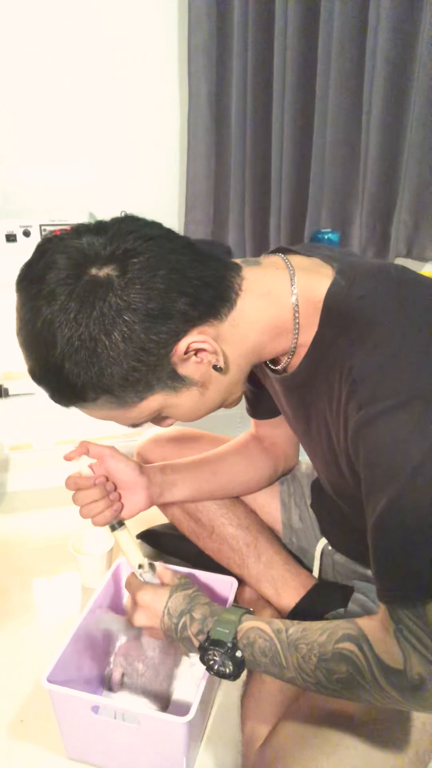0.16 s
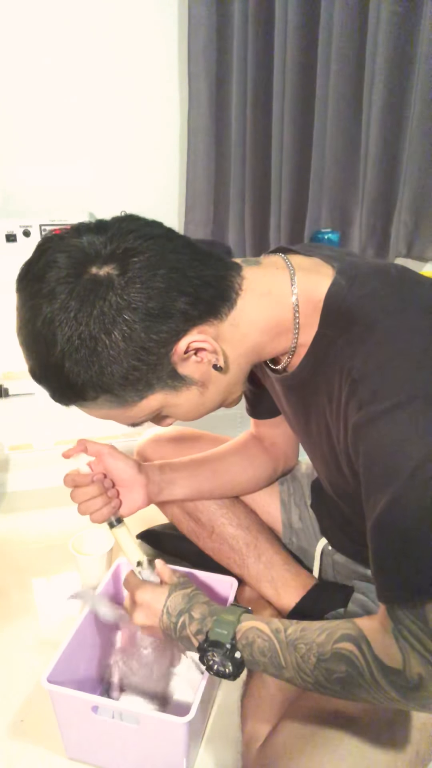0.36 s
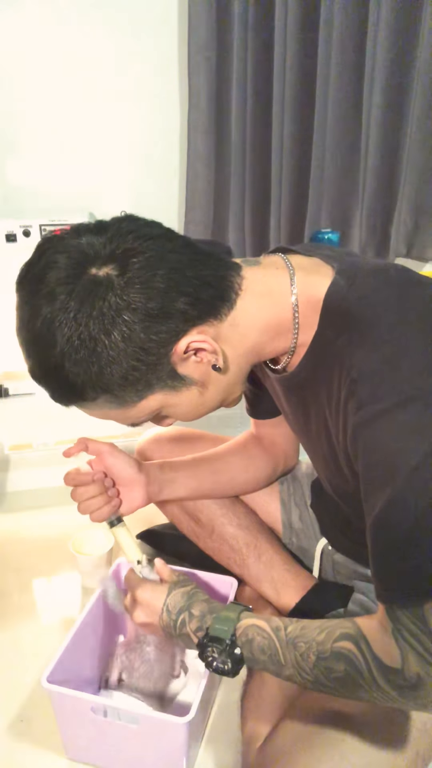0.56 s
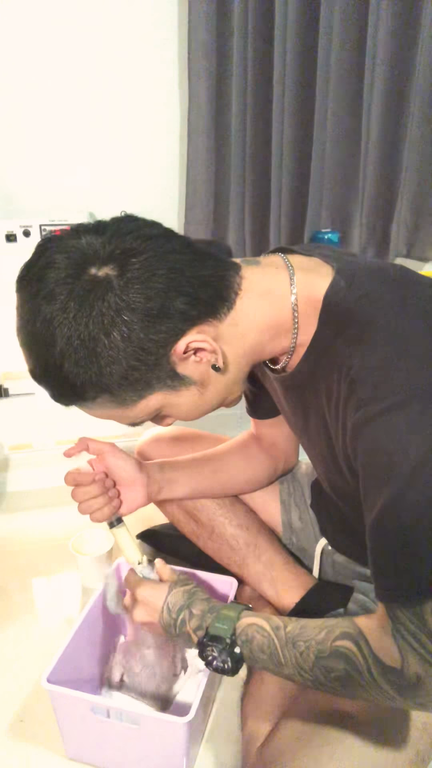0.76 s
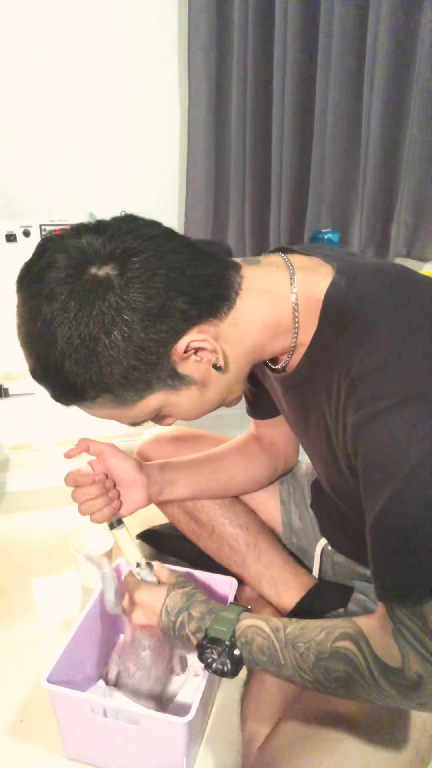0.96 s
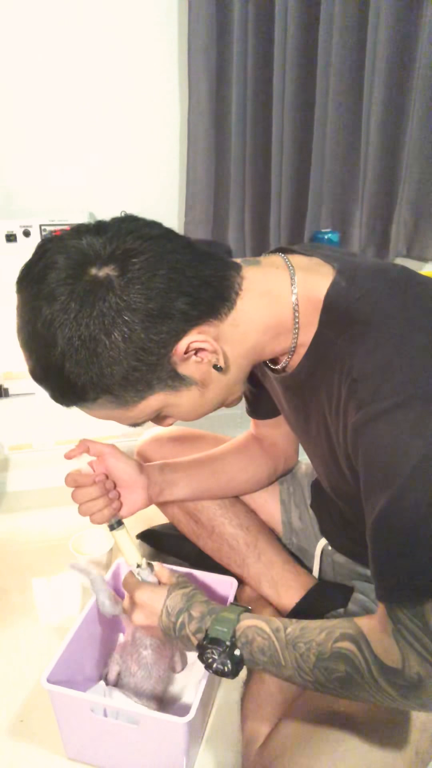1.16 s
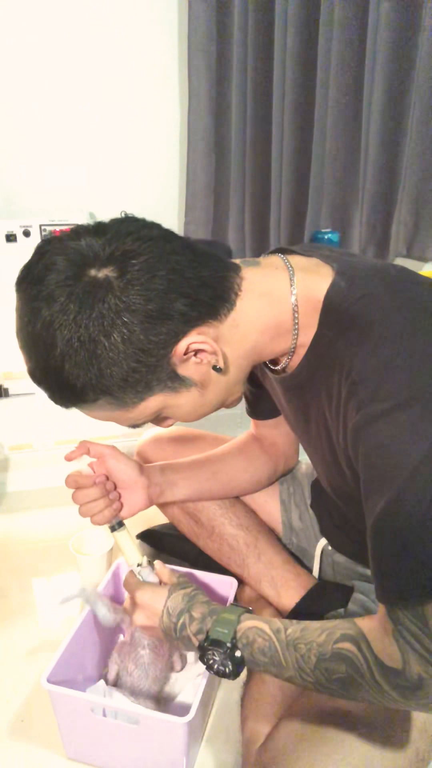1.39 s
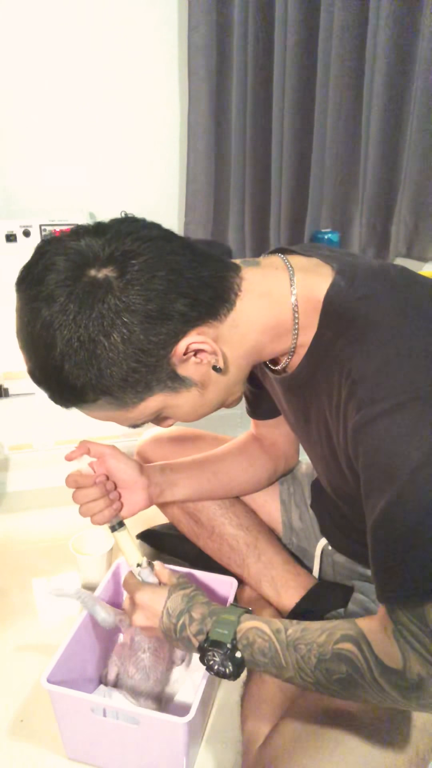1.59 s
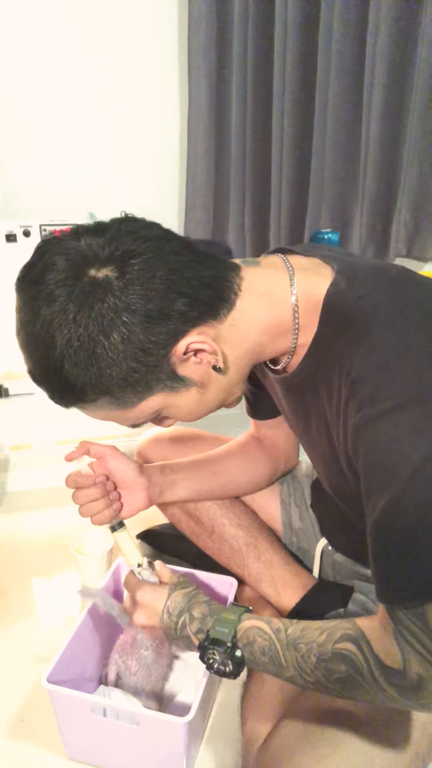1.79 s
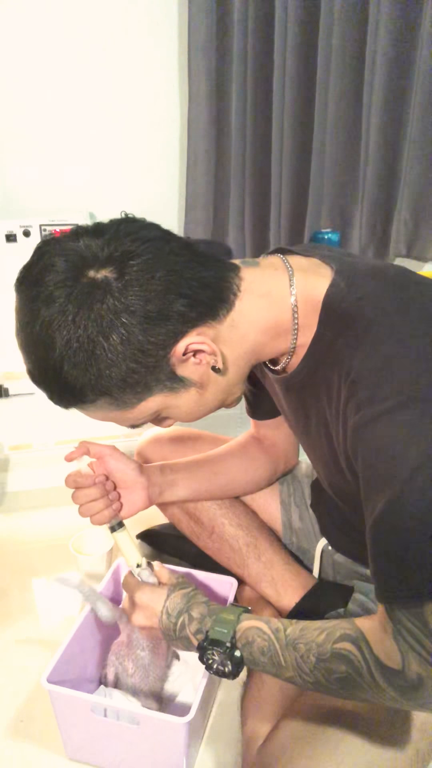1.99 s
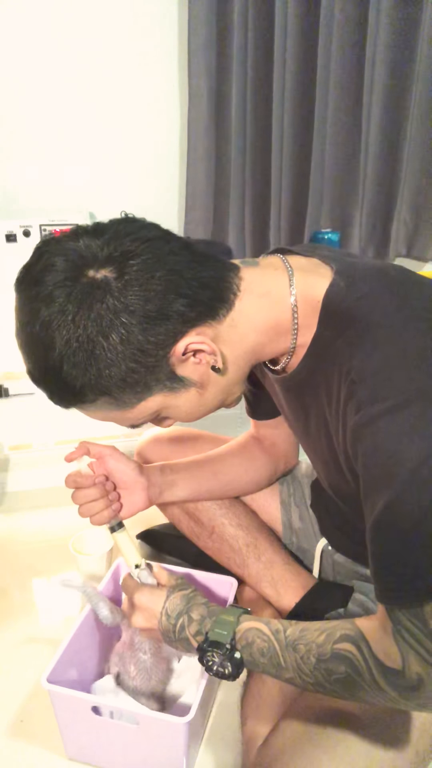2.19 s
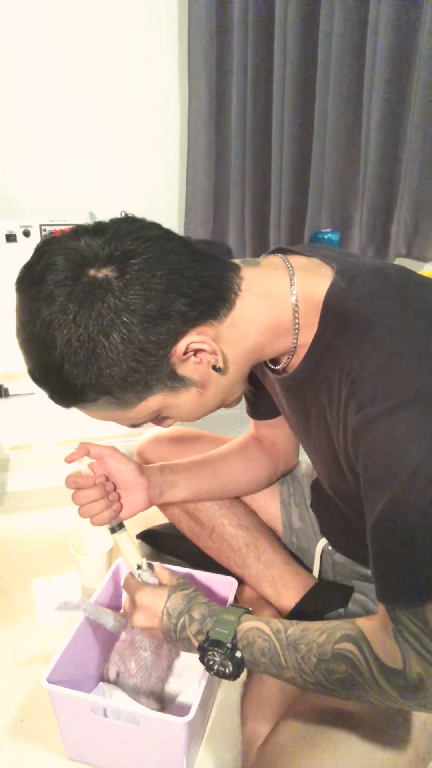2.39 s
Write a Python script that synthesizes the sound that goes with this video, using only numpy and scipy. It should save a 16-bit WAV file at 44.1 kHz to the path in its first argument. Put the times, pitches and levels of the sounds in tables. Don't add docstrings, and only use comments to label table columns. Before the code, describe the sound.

One loud raspy squawk from a baby parrot, followed by plastic knocks, clicks and paper rustle

```python
import sys
import numpy as np
from scipy import signal
from scipy.fft import rfft, irfft, next_fast_len
from scipy.io import wavfile
from scipy.ndimage import map_coordinates

SR = 44100
rng = np.random.default_rng(int(sys.argv[2]) if len(sys.argv) > 2 else 0)


def master(y):
    cut = np.clip(np.atleast_2d(y).T, -1, 1)
    pcm = np.round(cut * 32767)
    wavfile.write(sys.argv[1], SR, pcm.astype(np.int16))


def gain_from_decibels(decibels):
    exponent = np.asarray(decibels, float) / 20
    return 10 ** exponent


N = 108045


def unit(x):
    return x / np.sqrt(np.mean(x ** 2) + 1e-20)


def along(points, hz):
    f, v = np.transpose(points)
    return np.interp(np.log(hz + 1), np.log(f + 1), v)


def wobble(rate):
    knots = rng.standard_normal(int(N * rate / SR) + 4)
    return map_coordinates(knots, [np.arange(N) * rate / SR])


def filtered(x, response):
    m = next_fast_len(N + SR // 2)
    return irfft(rfft(x, m) * response(np.fft.rfftfreq(m, 1 / SR)), m)[..., :N]


def peak(f, hz, width):
    return 1j * f * width / (hz * hz - f * f + 1j * f * width)


def coloured(x, spectrum):
    return unit(filtered(x, lambda hz: gain_from_decibels(along(spectrum, hz))))


def bump(s, half):
    return np.exp(-.5 * ((np.arange(N) / SR - s) / half) ** 2)


def glide(s, half, hz0, hz1, waver):
    hz = np.interp(np.arange(N) / SR, [s - half, s + half], [hz0, hz1]) * (1 + waver)
    return bump(s, half * .7) * np.sin(2 * np.pi * np.cumsum(hz) / SR)


# f/Hz, t60/s
ROOM_DECAY = [(100, 0.51), (300, 0.47), (1000, 0.26), (4000, 0.25), (12000, 0.14)]


def room(x):
    delay_s = .006
    hz, t, z = signal.stft(rng.standard_normal(SR), SR, nperseg=256)
    decay = gain_from_decibels(-60 * t / along(ROOM_DECAY, hz)[:, None])
    tail = signal.istft(z * decay, SR, nperseg=256)[1]
    late = np.pad(x, (int(delay_s * SR), 0))
    return signal.fftconvolve(late, tail / np.linalg.norm(tail))[:N]


# f/Hz, level/dB per Hz
HUM_COLOUR = [(15, -57.5), (55, -3), (189, -8), (222, -3), (299, -9.5), (527, -15.5), (857, -23.5),
              (1010, -25), (15800, -48)]
# f/Hz, level/dB per Hz
CLOTH_COLOUR = [(600, -31), (1500, -2.5), (7000, 0.5), (8500, -19.5), (15500, -12.5)]


def air():
    t = np.arange(N) / SR
    hum_db = -57.5 + wobble(7.58)
    hum = gain_from_decibels(hum_db) * coloured(rng.standard_normal(N), HUM_COLOUR)
    stirred = np.clip((t - 0.195) / .1, 0, 1)
    cloth_db = -69 - 3.5 * t + 0.6 * wobble(25)
    return hum + stirred * gain_from_decibels(cloth_db) * coloured(rng.standard_normal(N), CLOTH_COLOUR)


# t/s, f/Hz, t60/s, level/dB
ROOM_BOOMS = [
    (.27, 125, 0.54, -44),
    (.43, 120, 0.55, -43.5),
    (.66, 104.3, 0.42, -37.5),
    (0.839, 104.9, 0.37, -41.5),
    (1.012, 105.4, 0.36, -44.5),
    (1.229, 105.8, 0.47, -41.5),
    (1.89, 122.7, 0.4, -42.5),
    (2.1, 104.2, 0.37, -44.5),
    (2.27, 102.5, 1, -51.5),
]


def booms():
    t, rise_s = np.arange(N) / SR, .03
    out = np.zeros(N)
    for s, hz, t60, db in ROOM_BOOMS:
        since = np.clip(t - s, 0, None)
        swell = gain_from_decibels(db - 60 * since / t60) * (1 - np.exp(-since / rise_s))
        out += swell * np.sin(2 * np.pi * hz * t)
    return gain_from_decibels(1.46 * wobble(33)) * out


def paper_grains():
    grains_per_s, spread_db = 1500, 4
    struck = rng.random(N) < grains_per_s / SR
    strength = gain_from_decibels(spread_db * np.minimum(rng.exponential(size=N), 2))
    return unit(struck * strength * rng.choice([-1, 1], size=N))


# middle t/s, half length/s, level/dB
RUSTLE_SWELLS = [(0.424, 0.021, -46.5), (0.484, 0.02, -57.5), (0.559, 0.017, -52), (0.596, 0.032, -55),
                 (0.702, 0.034, -60.5), (0.774, 0.011, -60), (0.916, 0.05, -60.5), (0.971, 0.0097, -70),
                 (1.09, 0.043, -66.5), (1.235, 0.038, -68), (1.331, 0.02, -69.5), (1.496, 0.01, -69.5),
                 (1.676, 0.018, -56.5), (1.798, 0.011, -65), (1.881, 0.0068, -61), (1.936, 0.019, -65.5),
                 (1.862, 0.063, -68), (2.09, 0.045, -68), (2.231, 0.022, -61), (2.296, 0.0094, -59.5),
                 (2.446, .015, -71)]
# f/Hz, level/dB per Hz
PAPER_COLOUR = [(350, -38.5), (600, -5), (1120, 1), (3330, -5), (4200, -4), (4880, -5.5), (7640, -9),
                (15500, -24)]


def bedding():
    rub = paper_grains() + 0.56 * rng.standard_normal(N)
    paper = coloured(rub, PAPER_COLOUR) * gain_from_decibels(2.3 * wobble(90))
    return paper * sum(gain_from_decibels(db) * bump(s, half) for s, half, db in RUSTLE_SWELLS)


def claw_scrape():
    grit = paper_grains() + rng.standard_normal(N)
    scrape = unit(filtered(grit, lambda f: peak(f, 4300, 500)))
    return gain_from_decibels(-61) * bump(.903, .028) * scrape


# start f/Hz, end f/Hz
SQUEAK_SLIDE = (5700, 6200)


def plunger_squeak():
    return gain_from_decibels(-66.5) * glide(2.14, .025, *SQUEAK_SLIDE, 0.033 * wobble(400))


# t/s, peak level/dB
CLICK_EVENTS = [(0.3094, -23), (0.4224, -25), (0.5145, -34.5), (0.5735, -28.5), (0.7043, -49.5),
                (0.7706, -57), (0.7823, -45), (0.8816, -39), (1.193, -50.5), (1.2309, -52.5), (1.3256, -54),
                (1.491, -55.5), (1.5975, -58), (1.6602, -45), (1.738, -48.5), (1.7889, -46), (1.8304, -43),
                (1.8536, -47), (2.2163, -39), (2.2905, -48), (2.3438, -48), (2.4213, -54.5)]
CLICK_TONES = [5000, 3450, 4500, 3304, 4500, 4210, 4500, 4160, 2640, 2730, 3870, 2053, 3067, 3650, 4000,
               3400, 6000, 3590, 3770, 3000, 4000, 4330]
CLICK_DECAYS = [.006, 0.0082, 0.011, 0.015, .015, 0.0086, 0.012, 0.013, 0.012, 0.014, 0.00997, 0.031,
                0.0077, .008, 0.017, 0.018, 0.031, 0.0067, 0.019, 0.022, 0.0064, 0.045]


def clicks():
    q, rise_share, snap_db = 6, .04, -19
    out, t = np.zeros(N + SR), np.arange(SR // 40) / SR
    for (s, db), hz, t60 in zip(CLICK_EVENTS, CLICK_TONES, CLICK_DECAYS):
        a, b = rng.standard_normal((2, len(t)))
        tick = 1.4 * signal.lfilter(*signal.iirpeak(hz, q, SR), a)
        tick += gain_from_decibels(snap_db) * signal.lfilter([1], [1, -.5], b)
        tick *= gain_from_decibels(-60 * t / t60) * (1 - np.exp(-t / (rise_share * t60)))
        out[round(s * SR):][:len(t)] += gain_from_decibels(db) * tick / abs(tick).max()
    return out[:N]


# t/s, peak level/dB, main f/Hz
KICK_EVENTS = [(0.266, -34.5, 207), (.348, -33, 400), (.372, -33, 360), (.414, -23.5, 650),
               (.432, -33, 255), (.445, -35.5, 524), (.462, -38, 600), (0.472, -31.5, 175),
               (0.491, -37.5, 485), (0.515, -39.5, 560), (.5745, -23.5, 602), (0.587, -46, 520),
               (0.595, -35, 936), (.6005, -31, 622), (.601, -34.5, 229), (0.6059, -32, 481),
               (.611, -32, 1065), (.620, -39.5, 720), (0.633, -48, 576), (.646, -46, 630), (.656, -42, 580),
               (.668, -39.5, 513), (.829, -39, 512), (0.929, -39.5, 226), (0.999, -41, 197),
               (1.126, -52, 692), (1.211, -39, 598), (1.216, -38, 189), (1.7896, -37.5, 1154),
               (1.8545, -47.5, 1530), (1.89, -51, 470), (2.05, -56, 470), (2.298, -38.5, 502),
               (2.311, -45, 299), (2.32, -47.5, 451)]
# multiple of main f, level/dB
WALL_MODES = [(.55, -10), (1, 0), (1.5, -3), (1.9, -6), (2.3, -2), (3.0, -7)]


def kicks():
    cycles, rise_s = 16, .001
    out, t = np.zeros(N + SR), np.arange(SR // 4) / SR
    for s, db, hz in KICK_EVENTS:
        ring = np.zeros(len(t))
        for k, level in WALL_MODES:
            a, b = rng.standard_normal(2)
            fade = gain_from_decibels(level + 2 * a - 60 * t * hz * k / cycles)
            ring += fade * np.sin(2 * np.pi * hz * k * (1 + 0.036 * b) * t)
        ring *= 1 - np.exp(-t / rise_s)
        out[round(s * SR):][:len(t)] += gain_from_decibels(db) * ring / abs(ring).max()
    return out[:N]


# f/Hz, width/Hz, level/dB
THROAT_CLOSED = [(1042, 117, -6.5), (1400, 68, -18), (2140, 100, -0.5), (2630, 283, -7), (3310, 180, -10.5),
                 (4000, 71, -6), (5160, 1300, -25), (7640, 380, -20), (11050, 1500, -34)]
# f/Hz, width/Hz, level/dB
THROAT_HALF = [(1170, 100, -6), (1510, 90, 0), (2150, 250, -15), (2700, 300, -17), (3500, 400, -13),
               (4000, 200, -13), (5000, 900, -19), (7500, 1500, -26), (11500, 2500, -35)]
# f/Hz, width/Hz, level/dB
THROAT_OPEN = [(940, 306, -4), (1240, 296, 0.5), (1535, 334, 0), (2130, 340, -2), (3164, 247, -6.5),
               (4090, 440, -9.5), (5000, 1010, -10.5), (6870, 3960, -20.5), (13150, 4100, -29)]
THROAT_NOTCH = (.95, .3, 0)
# f/Hz, width/Hz, level/dB
CROP_CAVITY = (497, 215, -7.5)


def throat(source, beak):
    cut = 693
    hz, width, db = CROP_CAVITY
    out = gain_from_decibels(db) * filtered(source * (0.98 + beak), lambda f: peak(f, hz, width) ** 2)
    throats = (THROAT_CLOSED, THROAT_HALF, THROAT_OPEN)
    for k, (modes, notch) in enumerate(zip(throats, THROAT_NOTCH)):
        def shape(f):
            ring = sum((-1) ** j * gain_from_decibels(db) * peak(f, c, w) for j, (c, w, db) in enumerate(modes))
            low_cut = (1j * f / (cut + 1j * f * 1.126 - f * f / cut)) ** 2 * (f / cut) ** 2
            notches = (1 - notch * peak(f, 9200, 1100)) * (1 - .8 * peak(f, 13100, 700))
            return ring * low_cut * notches

        gain = np.sqrt(np.mean(np.abs(shape(np.linspace(1, SR / 2, num=2000))) ** 2))
        share = np.sqrt(np.clip(1 - abs(beak - k), 0, 1))
        out += filtered(source * share, shape) / gain
    return out


def soften(pulses):
    return filtered(pulses, lambda f: 1 / (1 + 1j * f / 4500) ** 2)


# t/s, f/Hz, effort level/dB, breath share 0-1, beak opening 0-2
SQUAWK = [
    (0.195, 375.3, -48, 1, 0.2),
    (0.1974, 373.7, -37.5, 0, 0.051),
    (0.215, 375.9, -28, 0.41, 0.34),
    (.27, 384.8, -22.5, 0.24, 0.5),
    (0.287, 387.7, -19.5, 0.63, 0.23),
    (0.315, 372, -26.5, 0.02, 0.57),
    (0.347, 398.4, -22, 0.6, 1.95),
    (0.368, 408, -22, 1, 1.83),
    (.388, 403, -44, 0.8, 2),
]
# middle t/s, half length/s, start f/Hz, end f/Hz, level/dB
CLEAR_TONES = [
    (.3135, .005, 1130, 1200, -21),
    (.324, .007, 1400, 1540, -19),
    (.339, .007, 1490, 1570, -18.5),
    (.356, .007, 2050, 2150, -23),
    (.368, .009, 1550, 1680, -21),
]
# multiple of pitch, level/dB over effort
TRILL_WHISTLE = [(3, -3), (6, -3.5)]
# t/s, level/dB
MEMBRANE_SLAPS = [
    (.3448, 2),
    (.3474, 1),
    (.351, 3),
    (.3545, 0),
    (.3572, 2),
    (.36, 1),
    (.364, 3),
    (.3695, 0),
    (.373, 0),
    (.378, -6),
]


def chick():
    t = np.arange(N) / SR
    s, *cols = np.transpose(SQUAWK)
    hz, effort_db, breath, beak = [np.interp(t, s, c) for c in cols]
    breath, beak = np.clip(breath, 0, .65), np.clip(beak, 0, 2)
    on = (t > s[0]) & (t < s[-1])

    trilling = 1 / (1 + np.exp((t - .292) / .005))
    phase = 2 * np.pi * 44.5 * (t - .2174)
    bend = .045 * np.sin(phase)
    gate = (np.tanh(3.5 * (np.cos(phase) + .42)) - 1) / 2
    first_gap = 1 + 1.3 * np.exp(-abs(t - s[1]) / .011)
    trill_db = 11 * trilling * first_gap * gate

    turns = np.cumsum(hz * (1 + .035 * wobble(200) + trilling * bend)) / SR
    at = np.flatnonzero(np.diff(np.floor(turns)))
    pulses = np.zeros(N)
    pulses[at] = gain_from_decibels((1.5 + beak[at]) * rng.standard_normal(len(at)))
    pulses = soften(unit(pulses))
    puffs = unit(rng.standard_normal(N) * (1.7 + np.exp(-3 * (turns % 1))))
    source = np.sqrt(1 - breath) * pulses + np.sqrt(breath) * puffs
    source *= gain_from_decibels(effort_db + trill_db + 1.3 * wobble(163.8)) * on

    slaps = np.zeros(N)
    for slap_s, db in MEMBRANE_SLAPS:
        slaps[round(slap_s * SR)] = gain_from_decibels(db)
    source += soften(slaps)

    low_db = -19 + effort_db - 4.3 * beak + 1.8 * wobble(48)
    out = gain_from_decibels(low_db) * on * np.sin(2 * np.pi * 1.2 * turns)
    for *path, db in CLEAR_TONES:
        out += gain_from_decibels(db + 3 * wobble(130)) * glide(*path, .02 * wobble(250))
    steady = np.cumsum(hz * (1 + .01 * wobble(120) + bend)) / SR
    for k, db in TRILL_WHISTLE:
        level = gain_from_decibels(db + effort_db + trill_db + 0.91 * wobble(150)) * on * trilling
        out += level * np.sin(2 * np.pi * k * steady)
    return out + throat(source, beak)


def scene():
    background = air() + booms()
    small = bedding() + claw_scrape() + plunger_squeak() + clicks()
    knock, voice = kicks(), chick()
    echo = gain_from_decibels(-11.5) * room(voice + small) + gain_from_decibels(-6.5) * room(knock)
    return (background + small + knock + voice + echo)[None]


def band_limit(x):
    return signal.sosfilt(signal.butter(12, 16370, fs=SR, output="sos"), x)


def record(dry):
    mix = filtered(dry, lambda hz: (hz < 15700) * (1j * hz / (45 + 1j * hz)) ** 3)
    return band_limit(mix)


dry = scene()
out = record(dry)
master(out)
```